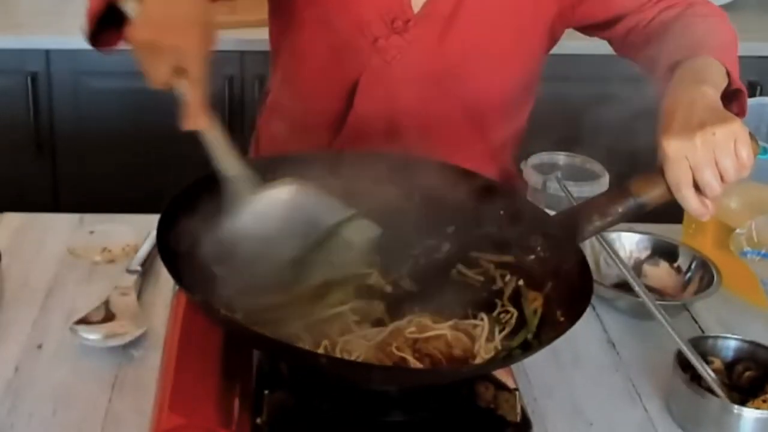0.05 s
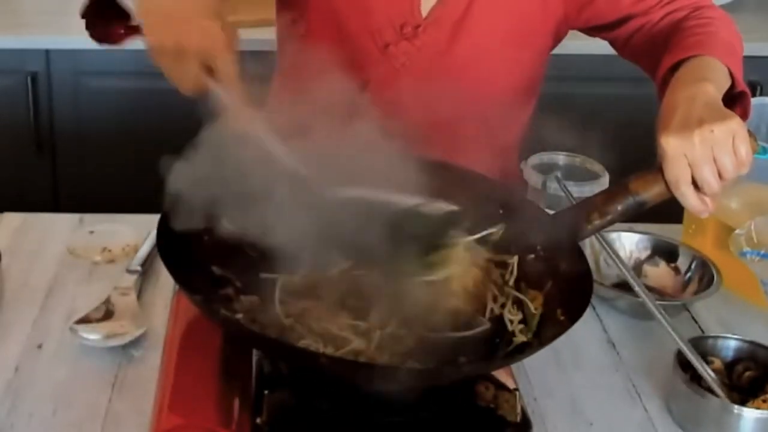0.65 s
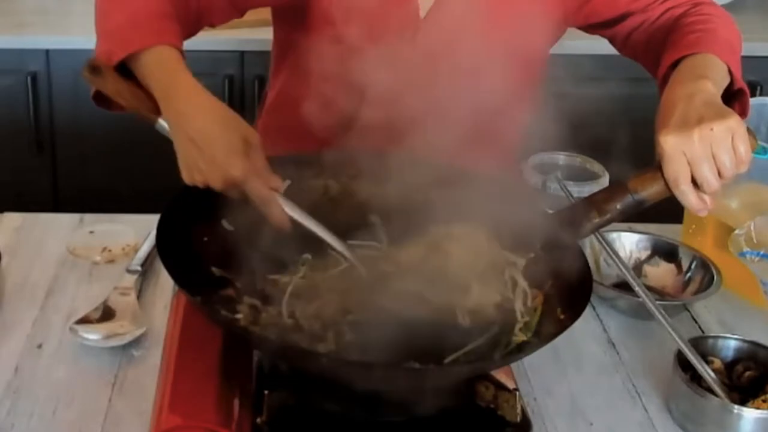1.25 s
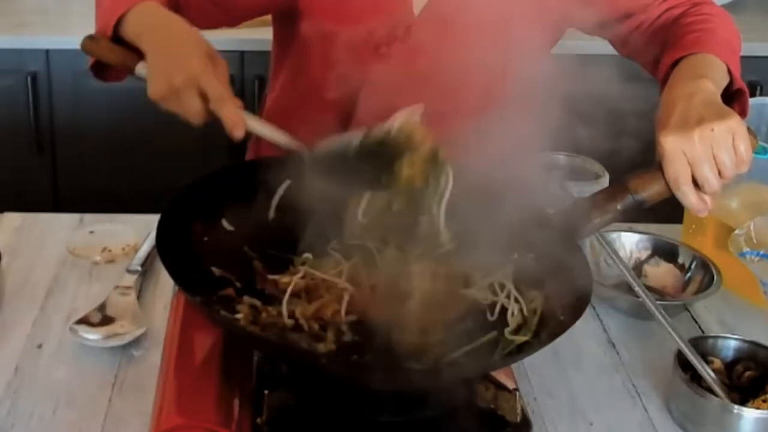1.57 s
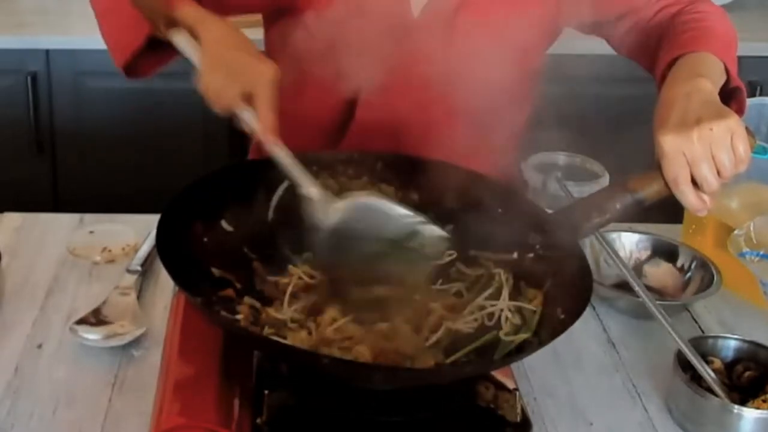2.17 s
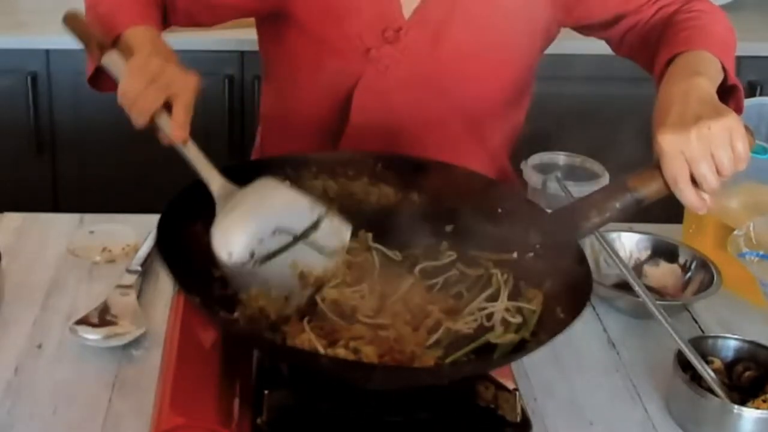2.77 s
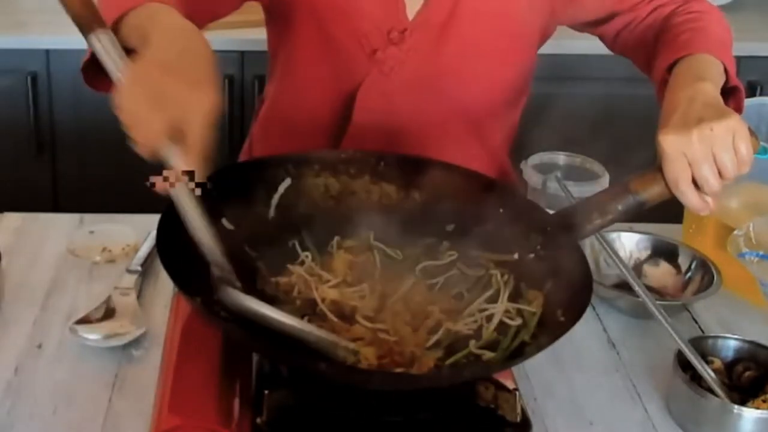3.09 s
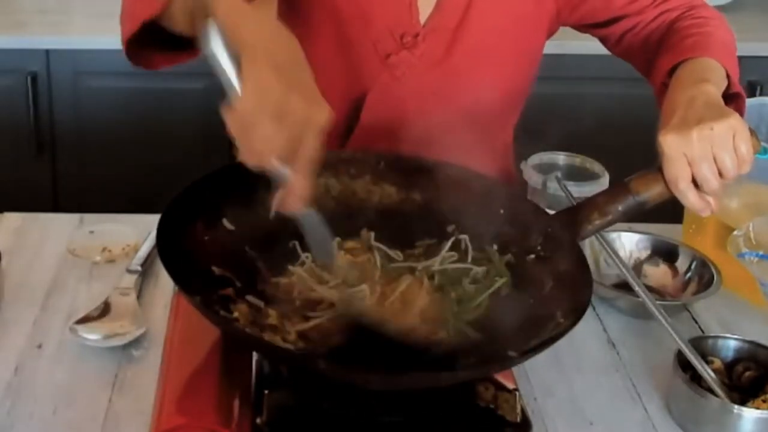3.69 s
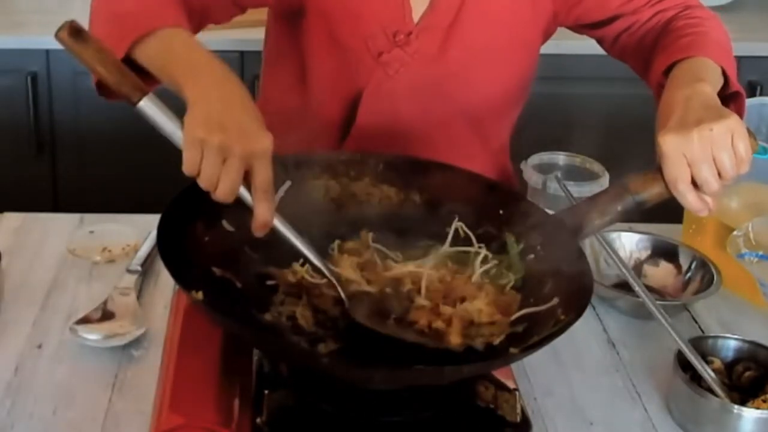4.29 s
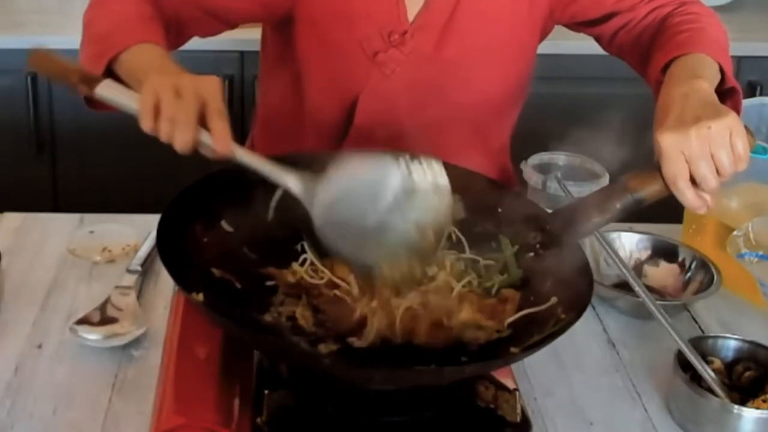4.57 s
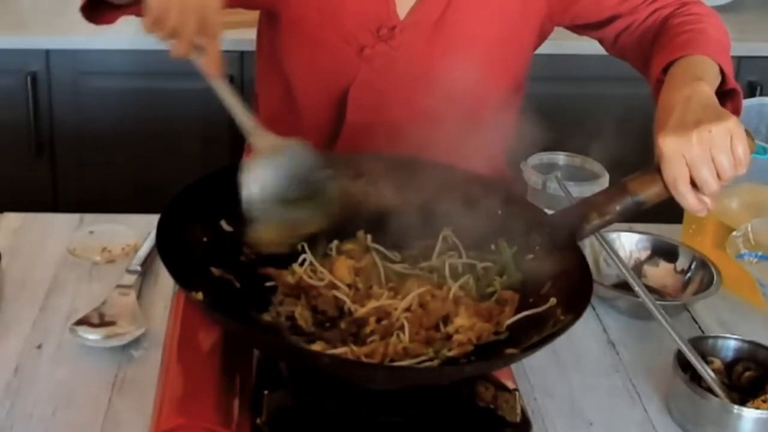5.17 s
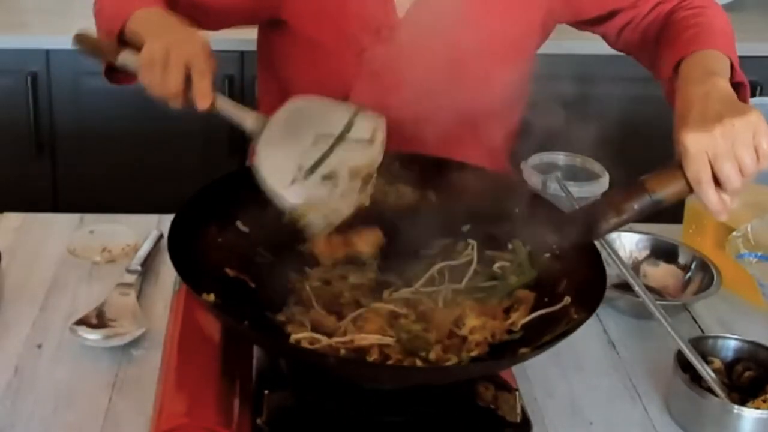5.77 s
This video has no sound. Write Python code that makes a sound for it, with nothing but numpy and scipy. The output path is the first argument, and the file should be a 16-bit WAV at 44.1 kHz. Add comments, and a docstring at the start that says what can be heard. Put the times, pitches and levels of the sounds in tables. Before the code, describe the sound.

Noodles sizzle in a hot wok while a metal spatula scrapes, knocks and squeals against the pan.

```python
"""Stir-fry in a wok

Noodles and bean sprouts sizzle in a hot wok. A steel spatula turns them: the blade scrapes, squeals
and knocks, the pan booms on its stand in a small kitchen, and wok and stove rumble under each push.
A close mono microphone feeds a fast limiter; the hardest knocks duck the sizzle and distort."""
import sys
import numpy as np
from scipy import signal
from scipy.fft import rfft, irfft, next_fast_len
from scipy.io import wavfile
from scipy.ndimage import uniform_filter1d, map_coordinates

SR = 44100
rng = np.random.default_rng(int(sys.argv[2]) if len(sys.argv) > 2 else 0)


def waveform_to_disk(signal):
    """Save audio, clipped to [-1, 1], as 16-bit WAV at the path in sys.argv[1]."""
    frames = np.transpose(np.atleast_2d(signal))
    scaled = np.clip(frames, -1, 1) * 32767
    samples = np.round(scaled).astype(np.int16)
    wavfile.write(sys.argv[1], SR, samples)


N = 266319

# wet food lands on hot steel: start_s, length_s, fry_db, spray_re_fry_db
FRY_FLARES = [(0, 0.16, -30, -3), (0.19, 0.41, -26, -6), (.36, 0.09, -34, 5), (.79, 0.12, -26, -4),
              (1.247, 0.37, -26.5, -3.5), (1.702, 0.23, -26.5, -9), (1.999, 0.35, -25.5, -12),
              (2.663, 0.34, -31.5, -15), (3.049, 0.19, -29, -3.5), (3.456, 0.24, -26, -4),
              (3.795, 0.5, -27, -4.5), (4.35, .37, -23.5, -13), (4.78, 0.54, -30.5, -4),
              (5.153, 0.32, -24.5, -17), (5.55, 0.56, -29.5, -18)]
# droplets bursting in oil: freq_hz, level_db
SIZZLE_SPECTRUM = [(30, -60), (150, -30), (300, -26.5), (700, -12), (1400, -2), (2400, -0.5), (3300, 3),
                   (4500, 1), (6800, 1), (7800, -3), (10000, -5.5), (16000, -9)]
# fine spray: freq_hz, level_db
SPRAY_SPECTRUM = [(500, -70), (3000, -40), (6500, -32), (8500, 0.5), (10500, -5), (12500, 0.5), (14500, -3),
                  (16000, -9.5)]
# stove rumble: freq_hz, level_db
STOVE_SPECTRUM = [(20, -62), (60, -29), (85, -13.5), (105, 0), (122, -6), (140, 0), (165, -13.5),
                  (205, -7.5), (400, -18), (1500, -58)]
# spatula strokes: start_s, length_s, scrape_db, pan_rub_db, stove_push_db, edge_hz, whine_db
SPATULA_STROKES = [(0, .04, -31, -34, -35.5, 3420, -30), (.12, 0.35, -29, -33, -41, 3470, -45),
                   (.66, .08, -29.5, -40, -40, 3610, -41), (.83, .19, -23.5, -35, -46, 3250, -35),
                   (1.33, 0.41, -33.5, -41, -51, 3370, -33), (1.77, .16, -22, -37, -44, 3690, -27),
                   (1.95, .12, -21, -33, -41.5, 2980, -26), (2.11, .19, -36, -34.5, -37.5, 3500, -42),
                   (2.6, .19, -23.5, -37, -33, 3430, -30), (2.83, .2, -25, -27.5, -40, 3490, -33),
                   (3.07, .08, -24.5, -37, -40, 3330, -24), (3.38, .05, -31, -63, -65, 3710, -21),
                   (3.52, .14, -29, -37, -43, 3665, -34), (3.77, .39, -22.5, -36.5, -42.5, 3370, -37),
                   (4.2, 0.36, -33, -39.5, -50, 3465, -27.5), (4.59, .14, -28, -36, -31.5, 3720, -22),
                   (4.89, .3, -24.5, -25.5, -34, 3450, -32), (5.21, .13, -24, -33, -44, 3750, -29),
                   (5.47, .23, -28, -33.5, -43, 3415, -30), (5.72, .08, -19, -34, -27, 3410, -23),
                   (5.91, .13, -19, -19.5, -30.5, 3436, -21)]
# steel grating on steel: freq_hz, level_db
GRIT_SPECTRUM = [(30, -65), (200, -45), (500, -19.5), (750, -7), (1100, -6.5), (1400, -1), (2400, -1),
                 (3500, 3), (4500, -0.5), (7000, -2.5), (9000, -14), (16000, -60)]
# dull body noise of the pan: freq_hz, level_db
THUD_SPECTRUM = [(20, -45), (100, -19), (220, -10), (330, -5), (460, 3), (620, -1), (820, -1), (1280, -8),
                 (1600, -41), (5000, -77)]
# steel spatula: freq_hz, level_db, t60_s
BLADE_MODES = [(797, -13, 0.11), (1002, -7, 0.099), (1233, -10, 0.083), (1359, -1, 0.14), (1462, -7, 0.072),
               (1786, -1, 0.065), (2200, -8, 0.19), (3093, -5, 0.12), (3280, -8, .13), (3400, -5.5, 0.26),
               (3614, -19, 0.082), (3700, -0.5, 0.14), (3850, 7.5, 0.051), (4480, -5, 0.11)]
# wok on its stand: freq_hz, level_db, t60_s
WOK_MODES = [(260.2, -13, 0.21), (286, -13, 0.17), (342.7, -6, 0.25), (402.7, -8, 0.28), (426.8, -3, 0.2),
             (478, 0, 0.18), (511, -3.5, 0.14), (561, -2.5, 0.066), (582.5, -6, 0.2), (650, -4, 0.1),
             (705.5, -4, 0.17), (787, -13, 0.25), (806, -15, 0.18), (927, -16, 0.19), (933, -5, 0.16),
             (1060, -7, 0.29), (1184, -24, 0.15), (1238, -9.5, 0.23), (1350, -17, 0.23)]
# light blade taps: start_s, wok_db, blade_db, hardness_db_per_octave
BLADE_TAPS = [(.001, -30, -24.5, 6), (.095, -27.5, -24, 6.5), (.651, -35.5, -19.5, 1), (.837, -32, -29, 3),
              (1.775, -40, -32, -6), (1.883, -20, -23, -4), (1.94, -23, -26, -10), (2.12, -28, -40, -1),
              (2.772, -18.5, -11.5, 0), (2.874, -27.5, -19, 7), (2.943, -31, -20.5, -4),
              (3.098, -36, -20, 12), (3.122, -23, -12, 16), (3.382, -21, -12, 24), (3.53, -36, -24.5, 6),
              (3.973, -24, -35, 8), (4.029, -30, -21.5, 8), (4.895, -18.5, -21, 14), (4.942, -17, -19, 19),
              (5.108, -28, -31, 8), (5.165, -29, -23.5, 0), (5.255, -27, -21, 5)]
# knocks that rock the wok: start_s, wok_db, blade_db, hardness_db_per_octave, rebound_gap_s
HARD_KNOCKS = [(2.569, -2, -10.5, -1, .044), (4.589, -4.5, -9, -4, 0.034), (5.725, -5.5, -8.5, -0.5, .027),
               (5.912, -8, -9.5, 1, 0.041)]
# the edge sticks and squeals: start_s, length_s, pitch_hz, level_db
EDGE_SQUEALS = [(0.88, 0.18, 1336, -36), (2.978, 0.063, 1353, -27.5), (3.085, 0.074, 1365, -26),
                (4.597, 0.062, 3800, -14), (4.889, 0.041, 1340, -18), (4.935, .034, 1447, -15),
                (4.993, 0.043, 1388, -15.5), (5.033, .042, 1388, -12), (5.085, 0.065, 1314, -20.5),
                (5.726, .04, 1350, -15.5), (5.73, 0.062, 2210, -16), (5.918, 0.054, 1348, -11)]

SIMMER_DB, SIMMER_SPRAY_DB = -28, -39  # gain floors between flares
STIR_DB, RUMBLE_FLOOR_DB = -43, -52  # gain floors between strokes: shifting food, faint low rumble


def amp(db):
    """Decibels to gain."""
    return 10 ** (np.asarray(db) / 20)


def unit(x):
    """Scale to rms 1."""
    return x / np.sqrt(np.mean(x ** 2) + 1e-20)


def add(track, start_s, sound):
    """Mix a sound into the track."""
    part = track[max(round(start_s * SR), 0):][:len(sound)]
    part += sound[:len(part)]


def wobble(rate_hz):
    """Smooth random curve through rate_hz knots a second."""
    knots = rng.standard_normal(int(N * rate_hz / SR) + 4)
    return map_coordinates(knots, [np.arange(N) * rate_hz / SR])


def colour(x, spectrum):
    """Shape x by a (freq_hz, level_db) spectrum; rms 1."""
    size = next_fast_len(len(x) + 8192)
    hz, db = np.transpose(spectrum)
    gain = amp(np.interp(np.log(np.fft.rfftfreq(size, 1 / SR) + 1), np.log(hz), db))
    return unit(irfft(rfft(x, size) * gain, size)[:len(x)])


def lowpass(x, cutoff_hz):
    """Brick-wall low-pass."""
    size = next_fast_len(N + 8192)
    return irfft(rfft(x, size) * (np.fft.rfftfreq(size, 1 / SR) < cutoff_hz), size)[:, :N]


def ticks(rate_hz, spread_db):
    """Impulses of random time and size; rms 1."""
    hits = rng.random(N) < rate_hz / SR
    return unit(hits * rng.standard_normal(N) * amp(spread_db * rng.standard_normal(N)))


def swells(starts_s, lengths_s, levels_db, attack_s, release_s):
    """Rise-hold-decay events summed in power; one gain curve per level column."""
    power = np.zeros((len(levels_db), N))
    for start_s, length_s, db in zip(starts_s, lengths_s, np.transpose(levels_db)):
        first = max(round(start_s * SR), 0)
        t = np.arange(min(N - first, 2 * SR)) / SR
        shape = np.minimum(t / attack_s, 1) * np.exp(-np.maximum(t - length_s, 0) / release_s)
        power[:, first:first + len(t)] += (amp(db)[:, None] * shape) ** 2
    return np.sqrt(power)


def patchy(x, depth_db):
    """Spots of the pan flare and dry out, each briefly and at its own pitch; rms 1."""
    bins = signal.stft(x, nperseg=512)[2]
    patches = uniform_filter1d(rng.standard_normal(bins.shape), size=4, axis=0)
    patches = unit(uniform_filter1d(patches, size=7, axis=1))
    return unit(signal.istft(bins * amp(depth_db * patches), nperseg=512)[1][:N])


def sizzle():
    """Droplets burst in the oil over steam hiss and fine spray; a few spit louder."""
    start_s, length_s, fry_db, spray_db = np.transpose(FRY_FLARES)
    fry, spray = swells(start_s, length_s, [fry_db, fry_db + spray_db], attack_s=0.065, release_s=0.2)
    droplets = ticks(rate_hz=5000, spread_db=2.5)
    steam = amp(4) * rng.standard_normal(N)
    spits = amp(-17) * ticks(rate_hz=96, spread_db=12)
    body = amp(3) * patchy(colour(droplets + steam + spits, SIZZLE_SPECTRUM), depth_db=1.76)
    flicker = amp(3 + 0.3 * wobble(33))
    mist = flicker * patchy(colour(ticks(rate_hz=12000, spread_db=2), SPRAY_SPECTRUM), depth_db=2.5)
    return np.hypot(fry, amp(SIMMER_DB)) * body + np.hypot(spray, amp(SIMMER_SPRAY_DB)) * mist


def stroke_gains():
    """Gain curves of the strokes: scrape, rub, push, whine."""
    start_s, length_s, scrape_db, rub_db, push_db, _, whine_db = np.transpose(SPATULA_STROKES)
    levels_db = [scrape_db, rub_db, push_db, whine_db]
    return swells(start_s, length_s, levels_db, attack_s=0.018, release_s=0.07)


def stove():
    """Wok and stove rumble under the spatula's pushes, over a faint steady low rumble."""
    _, _, push, _ = stroke_gains()
    return np.hypot(push, amp(RUMBLE_FLOOR_DB)) * colour(rng.standard_normal(N), STOVE_SPECTRUM)


def ring(modes, scatter_db, detune):
    """Steel touched once; each spot gives a new blend of modes, slightly retuned."""
    t = np.arange(SR // 3) / SR
    hz, db, t60_s = np.transpose(modes)[:, :, None]
    gain = amp(db + scatter_db * rng.standard_normal(hz.shape))
    hz = hz * (1 + detune * rng.standard_normal(hz.shape))
    phase = 2 * np.pi * (hz * t + rng.random(hz.shape))
    partials = gain * np.exp(-np.log(1000) * t / t60_s) * np.sin(phase)
    return np.sum(partials, 0) / np.sqrt(np.sum(gain ** 2) / 2)


def rubbed(slips, modes, scatter_db, detune):
    """Slips drive the modes; the blend changes as the contact travels; rms 1."""
    out, hop = np.zeros(N), SR // 5
    window = signal.windows.cosine(2 * hop)
    for first in range(0, N, hop):
        part = slips[first:first + 2 * hop]
        response = ring(modes, scatter_db, detune)
        add(out, first / SR, signal.fftconvolve(part * window[:len(part)], response))
    return unit(out)


def edge_tone(width_hz):
    """Edge resonance: a narrow rough band, pitched by each stroke's contact point; rms 1."""
    knots = sorted((start_s + share * length_s, hz)
                   for start_s, length_s, *_, hz, _ in SPATULA_STROKES for share in (0, 0.5))
    pitch_hz = np.interp(np.arange(N) / SR, *np.transpose(knots))
    phase = 2 * np.pi * np.cumsum(pitch_hz) / SR
    return unit(wobble(width_hz) * np.cos(phase) + wobble(width_hz) * np.sin(phase))


def scraping():
    """The edge slips over seasoned steel in tiny jerks that drive blade and pan."""
    scrape, rub, _, whine = stroke_gains()
    judder = amp(2.66 * wobble(40))
    slips = ticks(rate_hz=2000, spread_db=2) * judder
    grit = amp(-1) * colour(slips, GRIT_SPECTRUM)
    blade = amp(-8.5) * rubbed(slips, BLADE_MODES, scatter_db=6.5, detune=0.0114)
    edge = amp(-6.5 + 3.8 * wobble(30)) * edge_tone(width_hz=500)
    pan = amp(-6.5) * rubbed(slips, WOK_MODES, scatter_db=9, detune=0.0488)  # food shifts the modes
    pan += amp(-7) * colour(slips, THUD_SPECTRUM)
    return scrape * (grit + blade) + whine * edge + np.hypot(rub, amp(STIR_DB)) * pan


def noise_burst(spectrum, t60_s):
    """Coloured noise with exponential decay."""
    t = np.arange(SR // 3) / SR
    return colour(rng.standard_normal(len(t)), spectrum) * np.exp(-np.log(1000) * t / t60_s)


def tilted(table, db_per_octave, corner_hz=400):
    """Tilt modes or a spectrum above the corner."""
    return [(hz, db + db_per_octave * np.log2(max(hz / corner_hz, 1)), *rest) for hz, db, *rest in table]


def knock_contacts(count, loss_db):
    """A knocked wok rocks back against blade and stand, each contact weaker."""
    return [(start_s + k * gap_s, wok_db - k * loss_db, blade_db - k * loss_db, hardness)
            for start_s, wok_db, blade_db, hardness, gap_s in HARD_KNOCKS for k in range(count)]


def blows():
    """Taps and knocks ring wok and blade; the edge chatters briefly on the steel."""
    out, chatter = np.zeros(N), np.zeros(N)
    t = np.arange(SR // 3) / SR
    for start_s, wok_db, blade_db, hardness in knock_contacts(count=3, loss_db=2) + list(BLADE_TAPS):
        # bare steel wakes the upper modes; noodles under the blade leave the low ones
        boom = amp(-1) * ring(tilted(WOK_MODES, hardness), scatter_db=1.5, detune=0.003)
        thud = amp(-5.5) * noise_burst(tilted(THUD_SPECTRUM, hardness), t60_s=0.22)
        clang = ring(BLADE_MODES, scatter_db=4, detune=0.0026)
        rattle = amp(2) * noise_burst(GRIT_SPECTRUM, t60_s=0.13)
        add(out, start_s, amp(wok_db) * (boom + thud) + amp(blade_db) * (clang + rattle))
        add(chatter, start_s, amp(blade_db - 5.5) * np.exp(-t / 0.025))
    return out + chatter * edge_tone(width_hz=280)


def squeals(jitter=0.021, rough_db=5, upper_hz=2215, upper_db=-14):
    """Stick-slip locks briefly onto bending modes of the steel; pitch wavers, level stutters."""
    out = np.zeros(N)
    drift = 1 + jitter * wobble(300)
    stutter = unit(amp(rough_db * wobble(120)))
    for start_s, length_s, pitch_hz, level_db in EDGE_SQUEALS:
        phase_per_hz = 2 * np.pi * np.cumsum(drift[round(start_s * SR):][:int(length_s * SR)]) / SR
        tone = np.sin(pitch_hz * phase_per_hz) + amp(upper_db) * np.sin(upper_hz * phase_per_hz)
        add(out, start_s, amp(level_db) * signal.windows.tukey(len(tone), 0.4) * tone)
    return out * stutter


def kitchen(x, t60_s, wet_db):
    """Hard cupboards and worktops add a short echo."""
    tail = noise_burst([(100, 5.5), (4000, -5.5), (16000, -8)], t60_s)
    return x + amp(wet_db) * signal.fftconvolve(x, tail / np.linalg.norm(tail))[:N]


def limiter(x, ceiling_db, window_s, treble_hz, treble_squeeze):
    """Cut gain while short-term rms tops the ceiling; treble loses treble_squeeze times the dB again."""
    size = int(window_s * SR)
    level = np.sqrt(np.abs(uniform_filter1d(x[0] ** 2, size)) + 1e-12)
    gain = uniform_filter1d(np.minimum(1, amp(ceiling_db) / level), size)
    low = lowpass(x, treble_hz)
    return gain * (low + gain ** treble_squeeze * (x - low))


def treble_dip(x, start_s, length_s, depth_db, above_hz):
    """The top of the hiss dips once, briefly."""
    dip_db = np.zeros(N)
    add(dip_db, start_s, depth_db * signal.windows.tukey(int(length_s * SR), 0.5))
    low = lowpass(x, above_hz)
    return low + amp(dip_db) * (x - low)


def scene():
    """All sources centred; only the steel sounds get the room echo."""
    mono = sizzle() + stove() + kitchen(scraping() + blows() + squeals(), t60_s=0.49, wet_db=-14)
    return np.array([mono, mono])


def record(dry):
    """Fast limiter, soft clip, one treble dip, band limit."""
    x = limiter(dry, ceiling_db=-15, window_s=0.0024, treble_hz=8100, treble_squeeze=2.2)
    x = x / (1 + np.abs(x / amp(-9.7)) ** 6) ** (1 / 6)  # soft clip
    x = treble_dip(x, start_s=5.365, length_s=0.11, depth_db=-21, above_hz=8000)
    return lowpass(x, cutoff_hz=15750)


dry = scene()
out = record(dry)
waveform_to_disk(out)
```